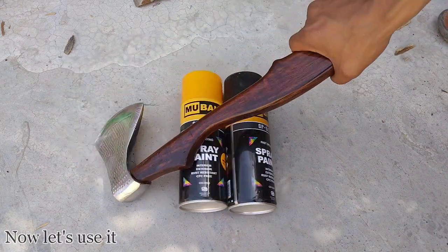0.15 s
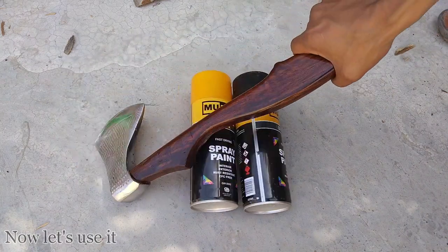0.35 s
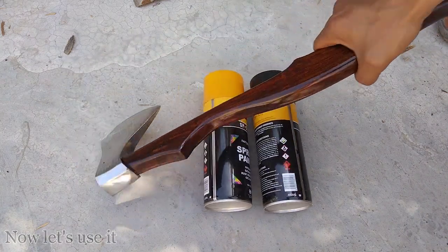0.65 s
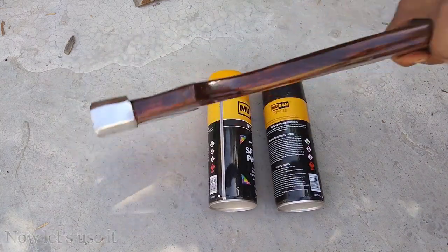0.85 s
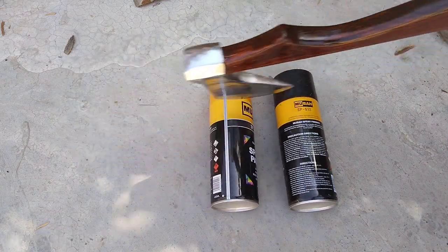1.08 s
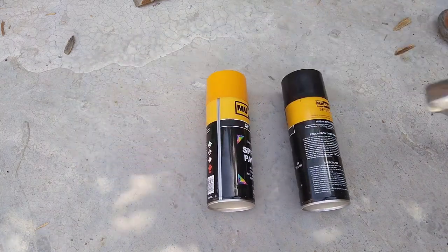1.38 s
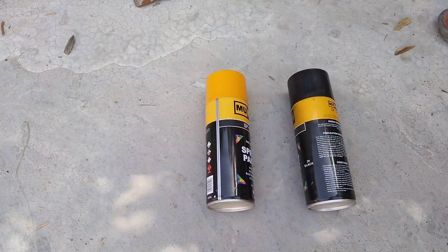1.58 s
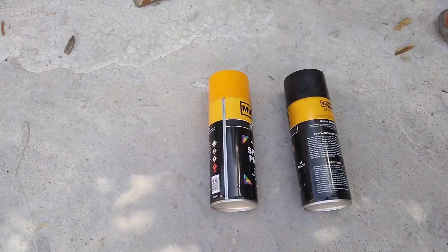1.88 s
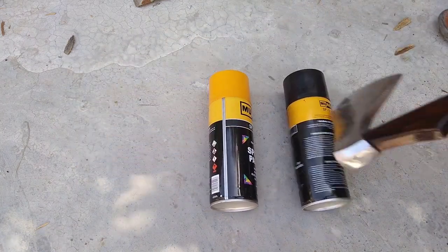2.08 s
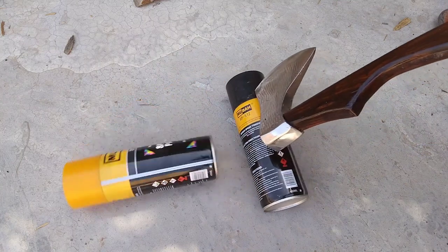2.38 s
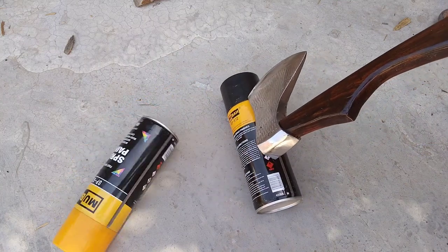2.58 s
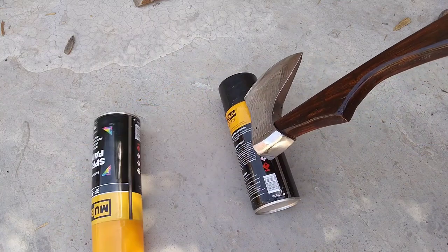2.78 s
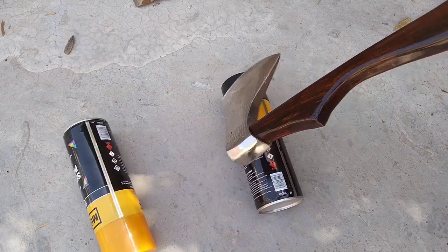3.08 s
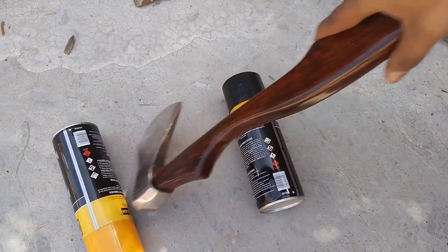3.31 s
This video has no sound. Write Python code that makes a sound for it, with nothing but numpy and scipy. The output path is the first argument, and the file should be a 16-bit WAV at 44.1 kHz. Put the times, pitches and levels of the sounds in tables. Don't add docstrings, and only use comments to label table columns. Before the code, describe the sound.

Metal spray cans scrape and clatter over rough concrete, pushed and then struck by an axe

```python
import sys
import numpy as np
from scipy import signal
from scipy.fft import rfft, irfft
from scipy.io import wavfile
from scipy.ndimage import uniform_filter1d

SR = 44100
rng = np.random.default_rng(int(sys.argv[2]) if len(sys.argv) > 2 else 0)


def wav_record(signal):
    frames = np.transpose(np.atleast_2d(signal))
    bounded = np.clip(frames, -1, 1)
    quanta = np.round(bounded * 32767).astype(np.int16)
    wavfile.write(sys.argv[1], SR, quanta)


def ratio_of_db(decibels):
    return 10 ** (np.asarray(decibels, float) / 20)


N = 152145

# (frequency [Hz], level [dB])
YARD = [(18, -53), (60, 3.5), (794, -8), (916, -12.5), (1320, -5.5), (4000, -14.5), (5200, -67.5),
        (8800, -120)]
YARD_DB, BED_FLICKER_DB = -78, 4.5
HUM_HZ, HUM_DB = 192, -84.5
# (start [s], length [s],
# frequency [Hz], level [dB])
TRACES = [(0.011, 0.051, 495, -67.5), (0.03, 0.37, 842, -69), (0.058, 0.1, 2100, -78.5),
          (0.136, 0.16, 1024, -72.5), (0.236, 0.24, 200, -64), (0, 0.032, 383, -68), (0.143, .08, 370, -72),
          (0.531, 0.065, 391.5, -71), (0.738, 0.051, 677, -74), (1.024, 0.061, 354, -69),
          (1.105, .12, 770, -70), (1.185, 0.089, 330, -69.5), (1.25, .07, 476, -68),
          (1.347, 0.087, 423, -68.5), (1.636, 0.17, 1620, -71.5), (1.329, 0.062, 3640, -55),
          (1.633, .3, 776, -72), (1.853, 0.22, 2870, -73.5), (1.87, 0.17, 3300, -72),
          (1.946, 0.14, 314, -75.5), (1.963, 0.19, 730, -80.5), (3.184, 0.22, 828, -64.5),
          (3.332, 0.12, 342, -66.5)]
TRACE_FLICKER_DB = 2.5

# (frequency [Hz], level [dB])
GRIT = [(560, -21.5), (900, -3), (2200, 1.5), (3100, -11), (3800, -4.5), (7500, -8), (9500, -14),
        (15500, -15)]
GRAINS_PER_S, GRAIN_SPREAD_DB, GRAIN_CAP_DB = 6000, 2.5, 12
TICKS_PER_S, TICK_S = 120, 0.0042
MINOR_DB, MINOR_WIDTH_HZ = 5, 21.3

# (frequency [Hz], width [Hz], level [dB])
PUSHED_MODES = [(1116, 30.6, 4), (1346, 22, 1.5), (1508, 35, -4.5), (1857, 16, 1), (2144, 37, -1),
                (2607, 69, -8.5), (3660, 290, -21)]
ROCKING_MODES = [(1138, 290, -10), (1373, 14, 8.5), (1554, 11, 0.5), (2014, 51, 0), (3645, 63, -9.5)]
SETTLING_MODES = [(1114, 45, -1.5), (1316, 44, 2), (1950, 99, -13), (2232, 16, 3.5)]
STRUCK_MODES = [(1033, 18, -2), (1340, 46, 4), (1430, 22.2, -15), (2070, 56, -3), (3700, 33, -8.5),
                (3590, 190, -7)]
SPINNING_MODES = [(1198, 9.5, -1), (1339, 3.9, 0), (1484, 2.9, -8.5), (1770, 22, -37), (2088, 13, 0),
                  (2108.6, 15, 0.5), (3000, 21, -15), (3563, 28, -13), (3877, 36, -17.5)]
SLIDING_MODES = [(1095, 80, -9), (1334, 24, 0.5), (1859, 20, -3), (2128, 32, 0.5), (2164, 66, -5),
                 (2430, 61, -8), (2880, 150, -12.5), (3820, 94, -9)]

# (time [s], shell level [dB], bare grit relative to shell [dB])
PUSH = [(.234, -25.5, -32.5), (.25, -25, -21), (.34, -23, -32), (.4, -33, -22.5), (.44, -41.5, -22),
        (.56, -57.5, -24.5), (.66, -62.5, -31)]
BLOW = [(2.261, -31, -9.5), (2.29, -33.5, -21.5), (2.36, -29.5, -21), (2.4, -31, -15.5),
        (2.44, -39.5, -12.5), (2.5, -42.5, -10.5)]
SPIN = [(2.4, -32.5, -12), (2.47, -26.5, -42), (2.52, -31, -12.5), (2.56, -24, -23.5), (2.65, -25.5, -22.5),
        (2.73, -31, -23.5), (2.79, -46, -18)]
LAST_SLIDE = [(2.72, -41, -15), (2.8, -28.5, -28.5), (2.9, -32, -23), (2.94, -34.5, -23), (2.968, -56, -5)]

# (time [s], peak [dB], body thud relative [dB])
KNOCKS = [
    (0.2369, -35.5, -6),
    (0.9384, -53.5, -10),
    (2.2618, -24, -6.5),
    (2.2983, -21.5, -8.5),
    (2.3133, -33.5, 2.5),
    (2.9725, -34, -28),
]
CRACK_S = 0.0013

# (time [s], peak [dB], frequency [Hz])
BUMPS = [(0.2475, -14.5, 1095), (0.2676, -13, 1360), (0.317, -24, 1360), (.337, -28, 1150),
         (0.4747, -36, 1370), (0.7134, -44.5, 1320), (0.74, -49.5, 1280), (0.7732, -39, 1320),
         (0.8113, -38.5, 1390), (0.935, -37.5, 890), (0.943, -35.5, 1395), (.958, -35.5, 1046),
         (1.0272, -45, 1340), (1.1191, -47, 1860), (1.2608, -51, 990), (1.2981, -38.5, 1134),
         (1.4773, -50, 1320), (1.6215, -55, 1145), (2.3133, -22.5, 1410), (2.332, -26, 690),
         (2.99, -40, 1320)]
BUMP_T60_S, BUMP_SNAP_S, BUMP_RING_DB = 0.079, 0.0026, -11

# (centre [s], length [s], level [dB], frequency [Hz])
SQUEALS = [(2.485, 0.029, -21.5, 2130), (2.552, 0.015, -22, 2140), (2.565, .014, -22, 2121),
           (2.586, .018, -21, 2121), (2.607, 0.022, -15, 2124), (2.628, 0.02, -19, 2140),
           (2.656, .018, -18, 2107), (2.686, .025, -24, 2121), (2.702, .013, -18.5, 2150),
           (2.727, 0.027, -21, 2112), (0.275, .025, -26.5, 2150), (.283, .022, -19, 1848),
           (0.263, .02, -24, 1392), (0.331, .05, -26, 1104), (.333, .04, -18.5, 1320),
           (0.359, .025, -30, 1110), (0.754, 0.093, -43.5, 1345), (0.449, 0.18, -36.5, 1365),
           (2.392, .05, -33, 975), (2.537, 0.21, -31, 1190), (2.86, 0.11, -39, 1340),
           (1.33, 0.056, -46, 2080)]

# (time [s], jump [dB], negative for a brief dip)
STONES = [(2.2973, 13), (2.319, 8), (2.333, -3), (2.265, 4.5), (2.387, 3), (2.42, 14), (2.463, 13),
          (2.5148, -4), (2.5392, 11), (2.581, 10.5), (2.5987, 12.5), (2.652, 11), (2.705, 13.5),
          (2.7487, 12), (2.786, 12.5), (2.8894, 2), (.3, 4), (.4743, -7), (0.772, 17.5), (1.4, 10)]
STONE_RISE_S, STONE_S = 0.0012, 0.0073

# (start [s], rise [s], length [s], shell level [dB], bare grit relative to shell [dB])
ROCKS = [(0.456, 0.032, 0.082, -36.5, -21), (0.642, 0.081, 0.1, -50.5, -23),
         (0.726, 0.022, 0.067, -51, -24), (0.791, 0.017, 0.048, -43, -24.5),
         (0.933, 0.031, 0.041, -39.5, -16.5), (1.008, 0.045, 0.079, -46.5, -30),
         (1.079, 0.057, 0.083, -48.5, -13.5), (1.187, 0.053, 0.097, -56, -21.5),
         (1.283, 0.044, 0.1, -47, -12.5), (1.367, 0.031, 0.037, -45, -19), (1.448, 0.012, 0.067, -61, -16),
         (1.57, .008, 0.02, -63.5, -12), (1.714, 0.005, 0.0094, -62, -7.5),
         (1.924, 0.055, 0.05, -58.5, -22), (2.236, 0.004, 0.0085, -64, -9.5),
         (2.968, 0.0024, 0.071, -41.5, -9.5), (3.063, 0.054, 0.09, -42, -24),
         (3.175, 0.0037, 0.074, -44.5, -8), (3.304, 0.02, 0.097, -50, -12)]
SAG_DB_S, FALL_DB_S = 47, 263
SETTLE_DB, TREMBLE_GRIT_DB = -66, -36

# (time [s], peak [dB])
TAPS = [
    (2.9706, -26.5),
    (3.1782, -15.5),
    (3.2114, -31),
    (3.3204, -40),
]
# (frequency [Hz], level [dB], decay by 60 dB [s])
TAP_MODES = [(771, -24, 0.29), (2100, -13.5, 0.046), (3880, -15.5, 0.084), (5044, 1, 0.035),
             (6570, -3.5, 0.036), (7440, -11.5, 0.075)]

HUSH_HZ, HUSH_DB = 10500, -81.5
TOP_HZ = 15700


def svf(x, hz, width):
    return signal.lfilter(*signal.iirpeak(min(hz, 0.45 * SR), hz / width, SR), x)


def unit(x):
    return x / np.sqrt(np.mean(x ** 2))


def walk(rate):
    k = int(SR / rate)
    steps = np.repeat(rng.standard_normal(N // k + 1), k)
    return unit(uniform_filter1d(uniform_filter1d(steps, k), k)[:N])


def colour(x, table):
    hz, db = np.array(table).T
    bins = np.log(np.fft.rfftfreq(N, 1 / SR) + 1)
    return irfft(rfft(x) * ratio_of_db(np.interp(bins, np.log(hz), db)), N)


def stroke(start, rise, length, sag_db=0.0):
    t = np.arange(N) / SR - start
    attack = np.sin(np.pi / 2 * np.clip(t / rise, 0, 1)) ** 2
    sag = -sag_db * np.clip(t - rise, 0, None)
    fall = -FALL_DB_S * np.clip(t - length, 0, None)
    return attack * ratio_of_db(sag + fall)


def trace(noise, start, length, hz, db):
    env = ratio_of_db(db) * stroke(start, 0.025, length)
    width = 45 + hz ** 2 / 3e4
    band = svf(svf(noise, hz, width), hz, width)
    flicker = ratio_of_db(TRACE_FLICKER_DB * walk(30.17))
    return unit(env * flicker * band) * np.sqrt(np.mean(env ** 2))


def yard():
    air = colour(rng.standard_normal(N), YARD)
    noise = rng.standard_normal(N)
    bed = np.zeros(N)
    for hz in 35 * 2 ** np.arange(0, 7, 0.25):
        flicker = ratio_of_db(BED_FLICKER_DB * min(hz / 500, 1) * walk(6.1))
        bed += flicker * svf(svf(air, hz, hz / 7), hz, hz / 7)
    traces = sum(trace(noise, *row) for row in TRACES)
    hum = ratio_of_db(HUM_DB) * unit(svf(noise, HUM_HZ, 3.4))
    return unit(bed) * ratio_of_db(YARD_DB) + traces + hum


def grains():
    chance, sign, size = rng.random((3, N))
    size_db = np.minimum(-GRAIN_SPREAD_DB * np.log(size + 1e-9), GRAIN_CAP_DB)
    return unit((chance < GRAINS_PER_S / SR) * np.sign(sign - 0.5) * ratio_of_db(size_db))


def ticks():
    chance, size = rng.random((2, N))
    hits = (chance < TICKS_PER_S / SR) * size
    return signal.lfilter([1], [1, -np.exp(-1 / (TICK_S * SR))], hits)


def scrape(force, bare, modes, body_db, clump_db, flicker_db=1.0):
    g = grains()
    shell = np.zeros(N)
    for k, (hz, width, db) in enumerate(modes):
        push = g * force * ratio_of_db(db + flicker_db * walk(10.81))
        shell += (-1) ** k * svf(push, hz, width)
    shell *= np.sqrt(SR / np.pi / sum(ratio_of_db(2 * db) * width for hz, width, db in modes))
    bare = bare * ratio_of_db(clump_db * (0.5 * walk(55) + 0.76 * ticks() - 1))
    rumble = ratio_of_db(body_db) * svf(svf(g * bare, 400, 560), 400, 560)
    return np.array([shell + rumble, unit(colour(g, GRIT)) * bare])


def slide(curve, modes, grit_db, body_db, clump_db):
    t = np.arange(N) / SR
    s, force_db, bare_db = np.array(curve).T
    on = uniform_filter1d(((t > s[0]) & (t < s[-1])) * 1.0, size=90)
    force = on * ratio_of_db(np.interp(t, s, force_db))
    bare = on * ratio_of_db(np.interp(t, s, force_db + bare_db) + grit_db)
    return scrape(force, bare, modes, body_db, clump_db)


def push():
    return slide(PUSH, PUSHED_MODES, grit_db=11.0, body_db=7, clump_db=0.0)


def minor(grit):
    out = grit.copy()
    for hz in 1500 * 2 ** (np.arange(34) / 13 + 0.04 * rng.standard_normal(34)):
        out += svf(grit * ratio_of_db(MINOR_DB + 5.34 * walk(15)), hz, MINOR_WIDTH_HZ * hz / 3000)
    return out


def knocks():
    length = 2600
    t, out = np.arange(length) / SR, np.zeros(N + length)
    for s, db, thud_db in KNOCKS:
        n, i = rng.standard_normal((2, length)), int(s * SR)
        fade = np.exp(-t / CRACK_S) + 0.17 * np.exp(-t / 0.0096)
        crack = np.where(t < 3 / SR, -3.0, n[0]) * fade
        ring = sum(ratio_of_db(d) * svf(crack, hz, 1.8 * width) for hz, width, d in STRUCK_MODES)
        thud = svf(n[1] * np.exp(-t / 0.011), 230, 600)
        knock = 0.5 * svf(crack, 6000, 12000) + ratio_of_db(13.5) * ring + ratio_of_db(thud_db + 13.5) * thud
        out[i:i + length] += ratio_of_db(db) * knock
    return out[:N]


def bumps():
    length = 5000
    t, out = np.arange(length) / SR, np.zeros(N + length)
    for s, db, hz in BUMPS:
        i = int(s * SR)
        env = np.exp(-t / BUMP_SNAP_S) + ratio_of_db(BUMP_RING_DB) * 1000.0 ** (-t / BUMP_T60_S)
        tone = env * np.sin(2 * np.pi * hz * t)
        out[i:i + length] -= ratio_of_db(db) * svf(svf(tone, hz, 1.9 * hz), hz, 1.9 * hz)
    return out[:N]


def squeals():
    t, out = np.arange(N) / SR, np.zeros(N)
    phase = 2 * np.pi * np.cumsum(1 + 0.00619 * walk(150)) / SR
    for s, length, db, hz in SQUEALS:
        swell = np.cos(np.pi * np.clip((t - s) / length, -0.5, 0.5)) ** 4.3
        out += ratio_of_db(db) * swell * np.sin(hz * phase)
    return out


def stones():
    s, jump_db = np.array(STONES).T
    t = np.clip(np.arange(N) / SR - s[:, None], 0, None)
    return 1 + (ratio_of_db(jump_db) - 1) @ ((1 - np.exp(-t / STONE_RISE_S)) * np.exp(-t / STONE_S))


def rocking():
    env = np.array([stroke(*row[:3], SAG_DB_S) for row in ROCKS])
    db, bare_db = np.array(ROCKS)[:, 3:].T
    force, bare = ratio_of_db(db - 6.5) @ env, ratio_of_db(db + bare_db + 9) @ env
    rocks = scrape(force, bare, ROCKING_MODES, body_db=-14, clump_db=3.56)
    tremble = ratio_of_db(SETTLE_DB) * stroke(0.65, 0.037, 1.64)
    settling = scrape(tremble, tremble * ratio_of_db(TREMBLE_GRIT_DB), SETTLING_MODES,
                      body_db=-10.0, clump_db=17.0, flicker_db=5.5)
    return rocks + settling


def blow():
    return slide(BLOW, STRUCK_MODES, grit_db=13.5, body_db=8.0, clump_db=3.5)


def spin():
    return slide(SPIN, SPINNING_MODES, grit_db=8.0, body_db=-1.5, clump_db=3.5)


def last_slide():
    return slide(LAST_SLIDE, SLIDING_MODES, grit_db=9.0, body_db=-5.5, clump_db=1.0)


def taps():
    length = 5000
    t, out = np.arange(length) / SR, np.zeros(N + length)
    for s, db in TAPS:
        u = rng.random((len(TAP_MODES), 2))
        n, i = rng.standard_normal(length), int(s * SR)
        ring = np.zeros(length)
        for (hz, d, t60), (strength, detune) in zip(TAP_MODES, u):
            tone = np.sin(2 * np.pi * hz * (1 + 0.022 * (detune - 0.5)) * t)
            env = 1000.0 ** (-t / t60) * (1 - np.exp(-t / 0.00071))
            ring += ratio_of_db(d + 5.4 * (strength + 1.0)) * tone * env
        rough = 1 + 0.5 * unit(uniform_filter1d(n, size=40))
        tick = svf(n * np.exp(-t / 0.0084), 4100, 7100)
        out[i:i + length] += ratio_of_db(db) * (ratio_of_db(-11.0) * ring * rough + ratio_of_db(-13) * tick)
    return out[:N]


def scene():
    shell, grit = push() + rocking() + blow() + spin() + last_slide()
    cans = shell + minor(grit * stones()) + knocks() + bumps() + squeals()
    cans = cans + svf(taps(), 3350, 10400)
    low_cut = signal.butter(2, 90, "high", fs=SR, output="sos")
    return (yard() + signal.sosfilt(low_cut, cans))[None]


def hush(x):
    high = signal.butter(4, HUSH_HZ, "high", fs=SR, output="sos")
    top = signal.sosfiltfilt(high, x)
    power = uniform_filter1d(top ** 2, size=900)
    return x - top / (1 + power / ratio_of_db(2 * HUSH_DB))


def band_limit(x):
    return signal.sosfilt(signal.butter(12, 16640, fs=SR, output="sos"), x)


def record(dry):
    top_cut = signal.ellip(8, 0.2, 60, TOP_HZ, fs=SR, output="sos")
    mix = signal.sosfilt(top_cut, hush(dry))
    return band_limit(mix)


dry = scene()
out = record(dry)
wav_record(out)
```